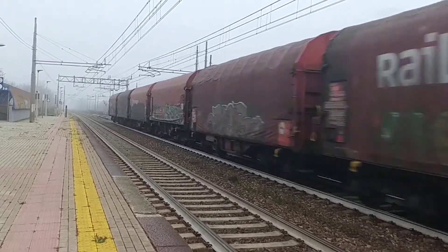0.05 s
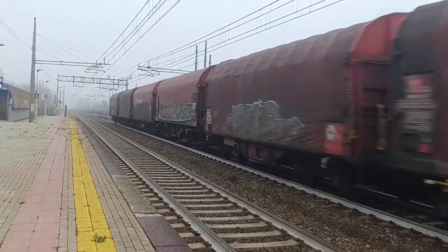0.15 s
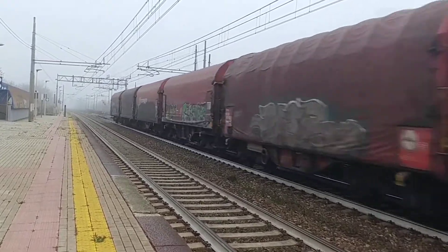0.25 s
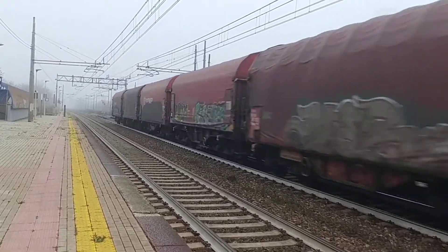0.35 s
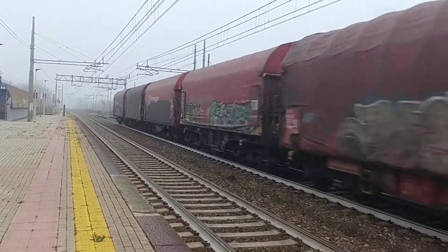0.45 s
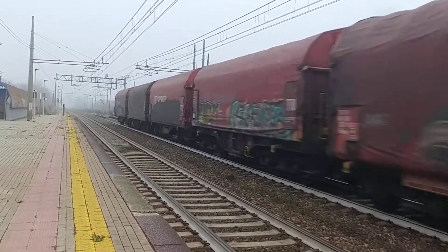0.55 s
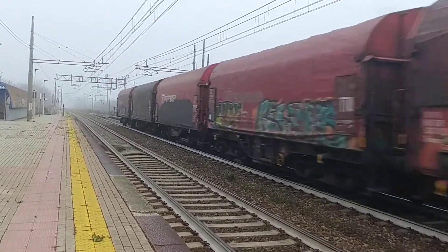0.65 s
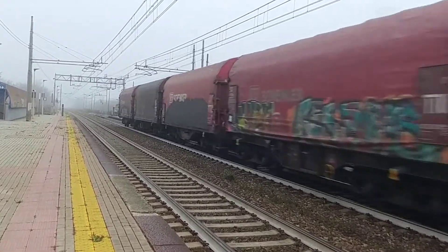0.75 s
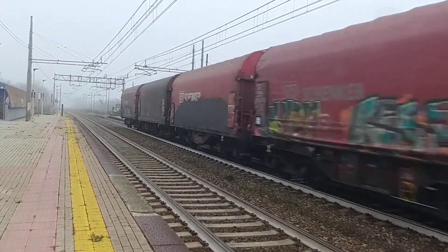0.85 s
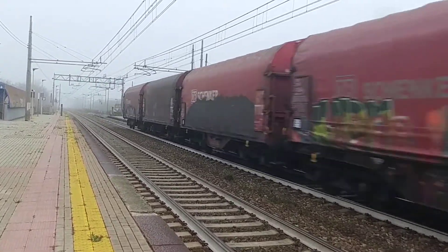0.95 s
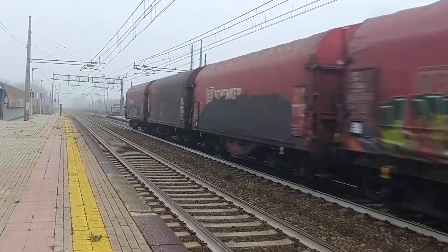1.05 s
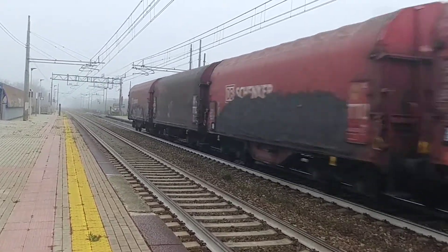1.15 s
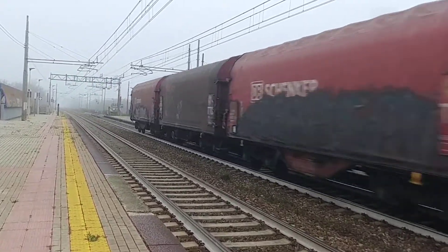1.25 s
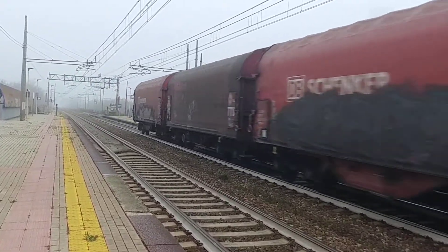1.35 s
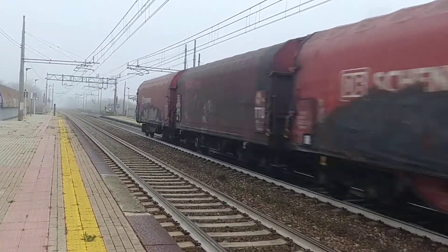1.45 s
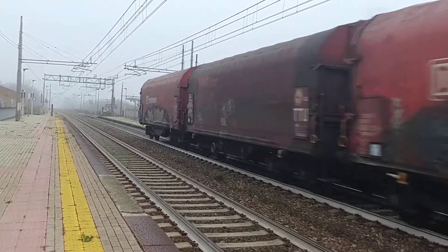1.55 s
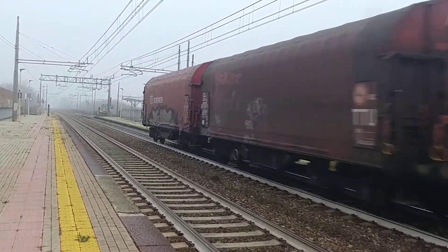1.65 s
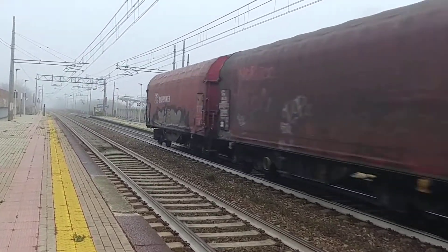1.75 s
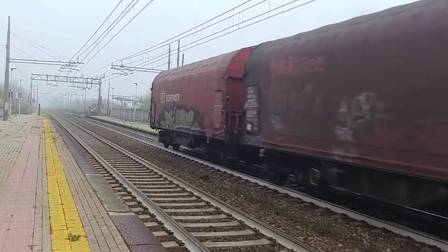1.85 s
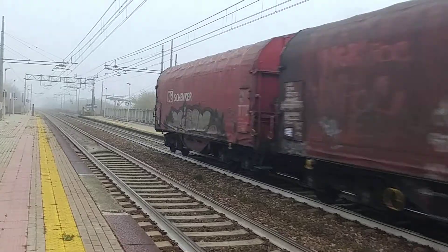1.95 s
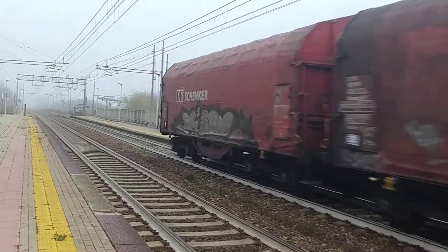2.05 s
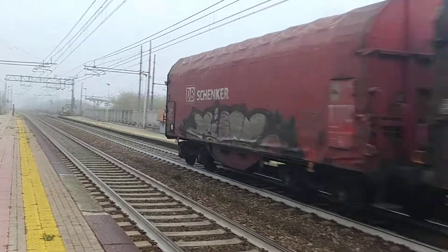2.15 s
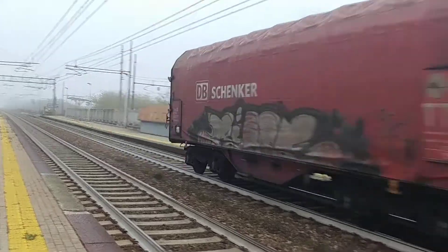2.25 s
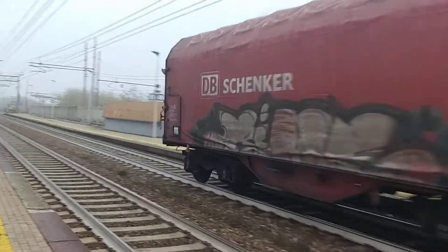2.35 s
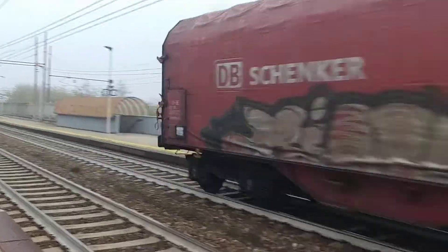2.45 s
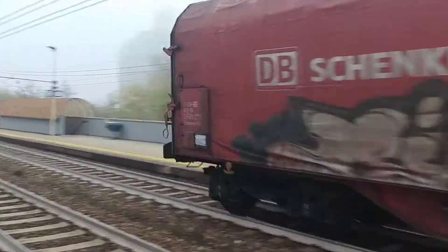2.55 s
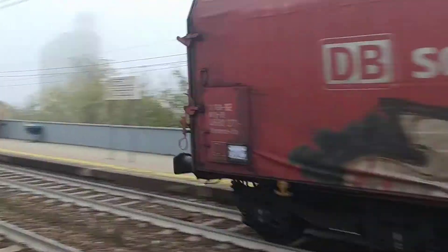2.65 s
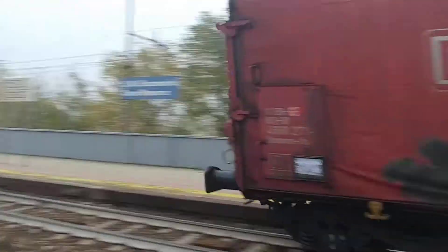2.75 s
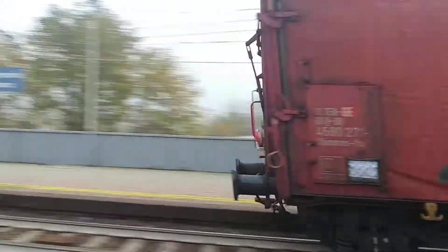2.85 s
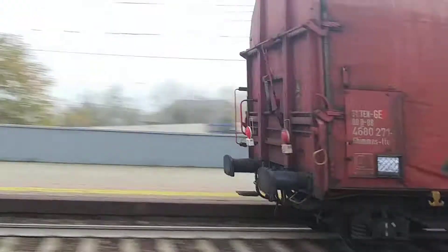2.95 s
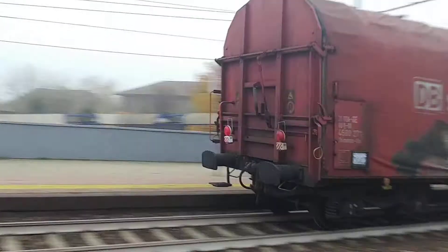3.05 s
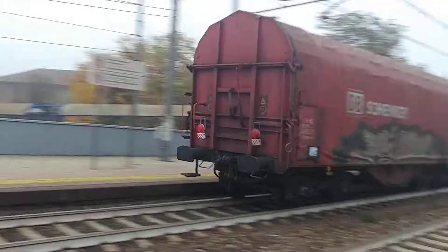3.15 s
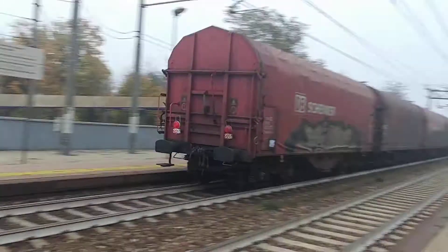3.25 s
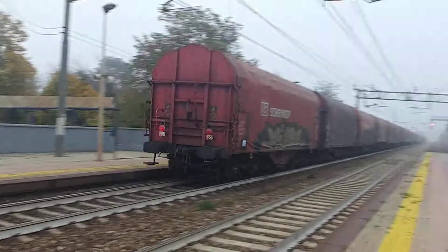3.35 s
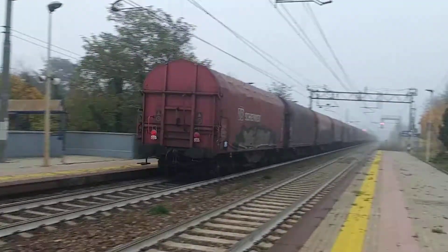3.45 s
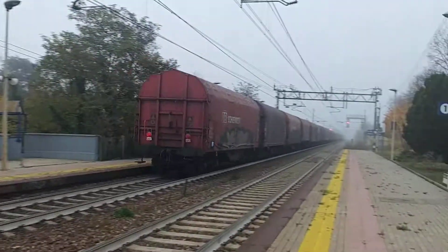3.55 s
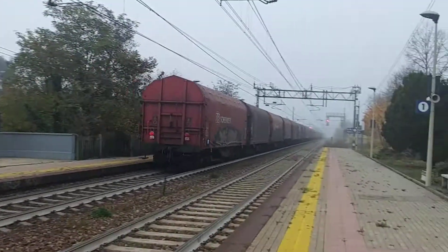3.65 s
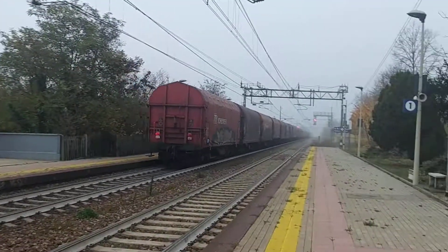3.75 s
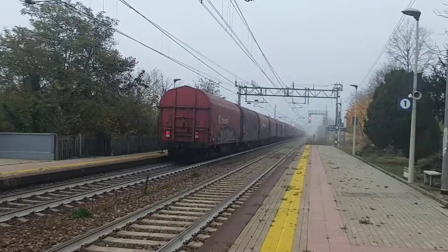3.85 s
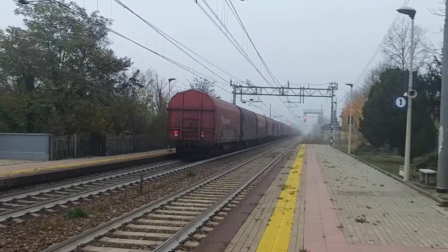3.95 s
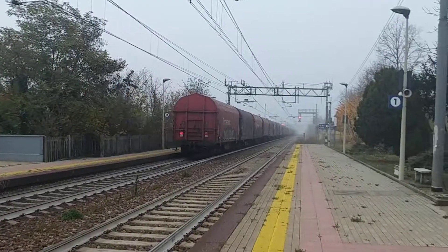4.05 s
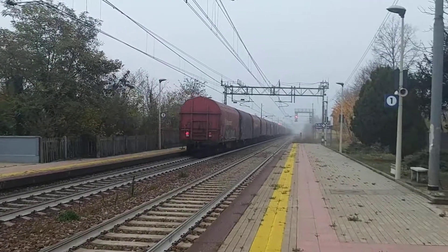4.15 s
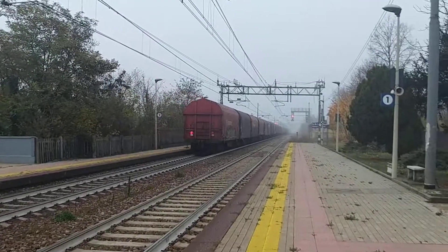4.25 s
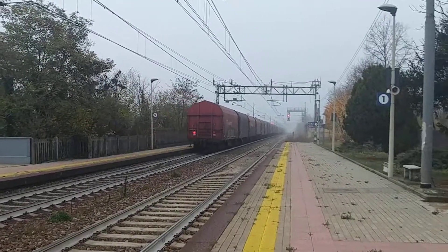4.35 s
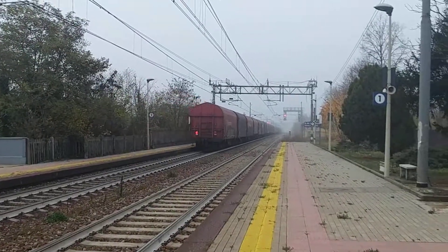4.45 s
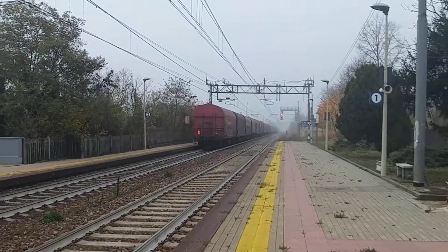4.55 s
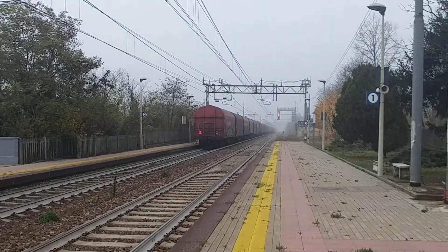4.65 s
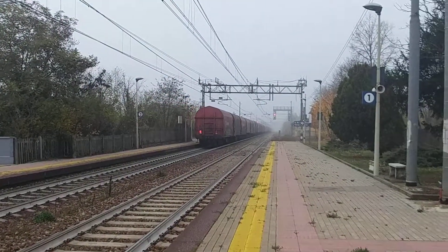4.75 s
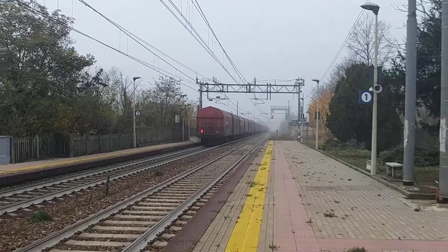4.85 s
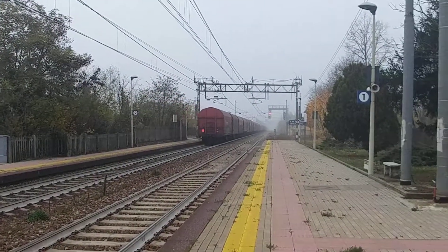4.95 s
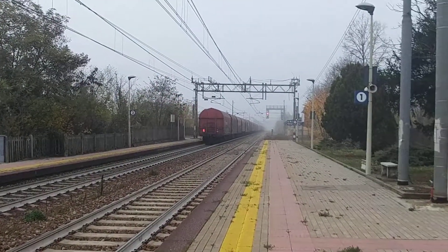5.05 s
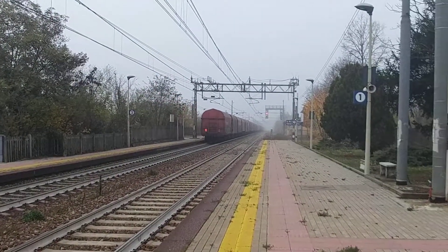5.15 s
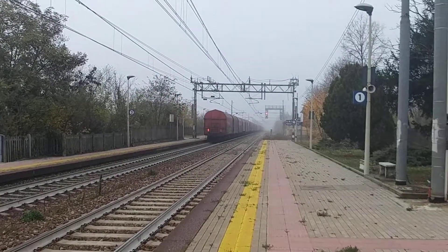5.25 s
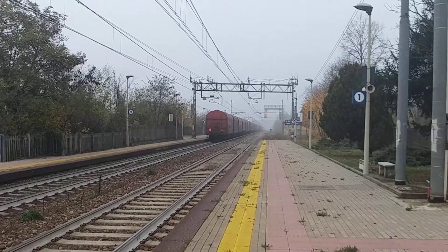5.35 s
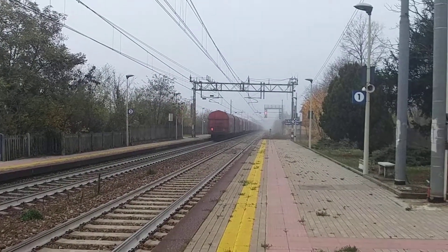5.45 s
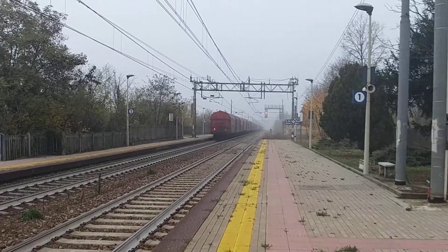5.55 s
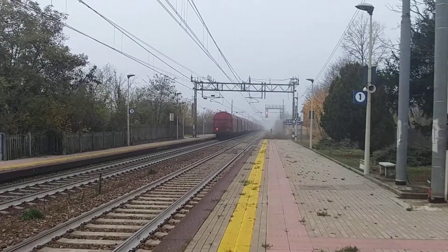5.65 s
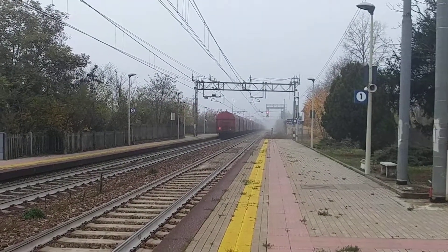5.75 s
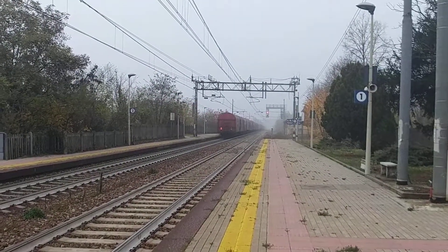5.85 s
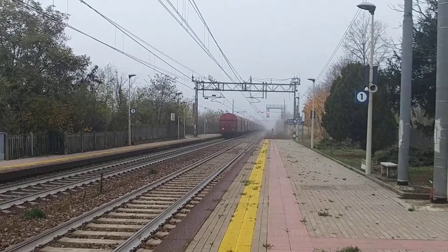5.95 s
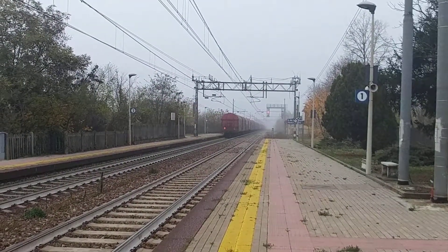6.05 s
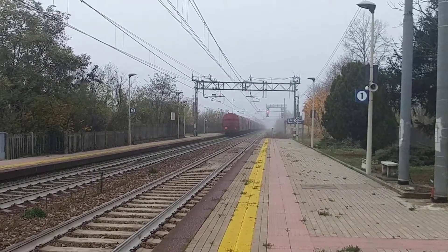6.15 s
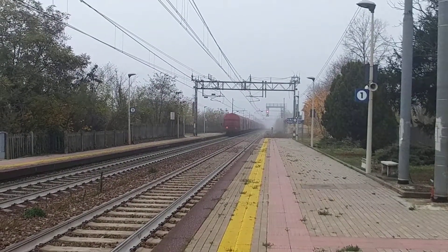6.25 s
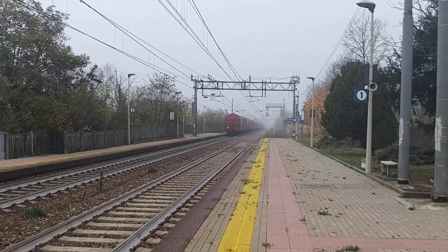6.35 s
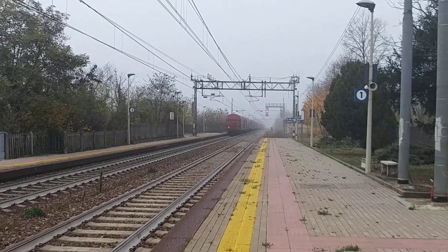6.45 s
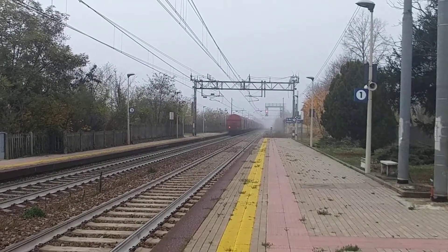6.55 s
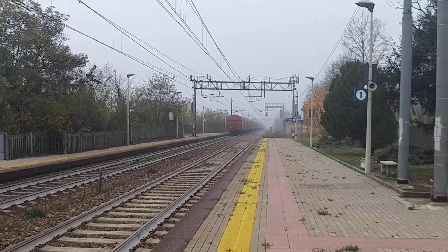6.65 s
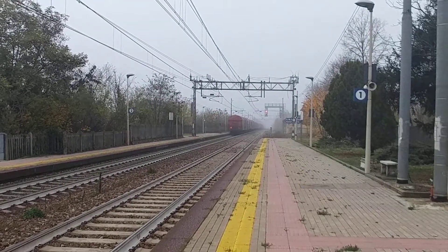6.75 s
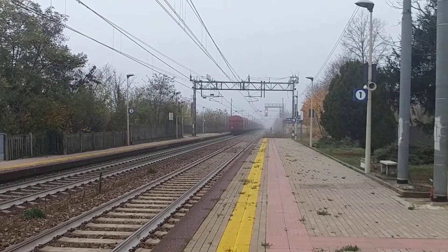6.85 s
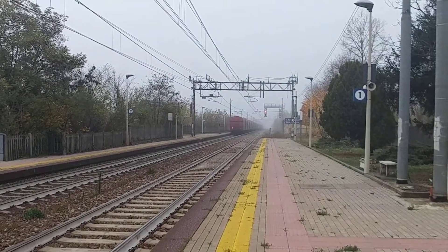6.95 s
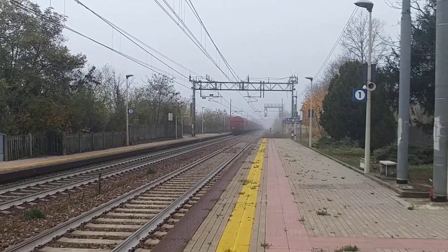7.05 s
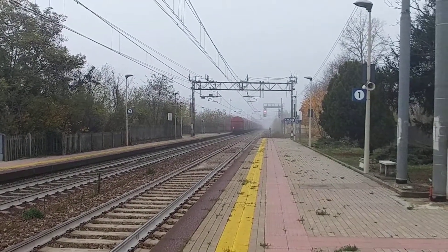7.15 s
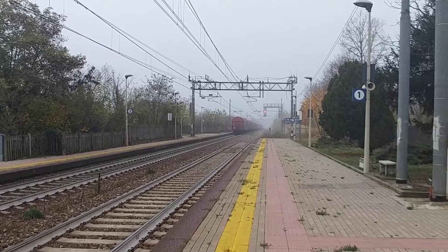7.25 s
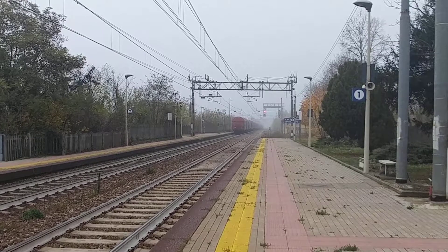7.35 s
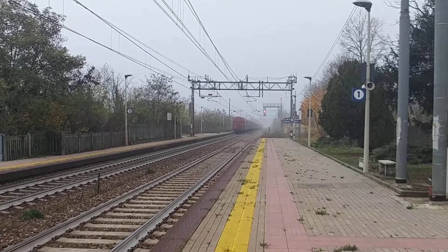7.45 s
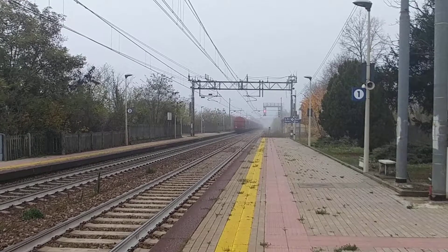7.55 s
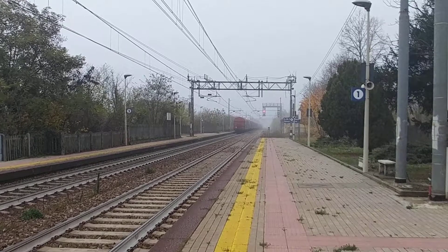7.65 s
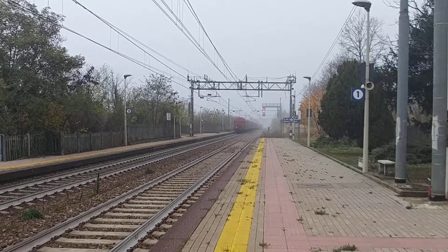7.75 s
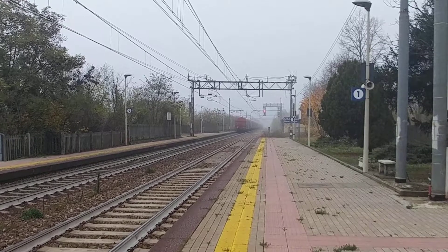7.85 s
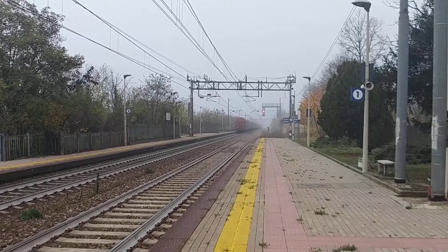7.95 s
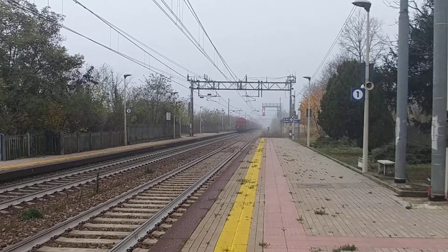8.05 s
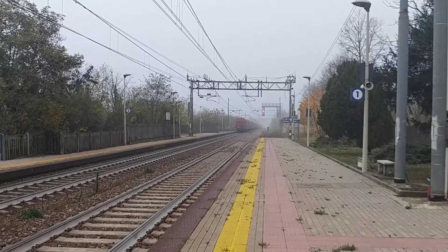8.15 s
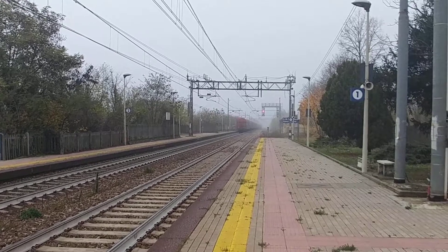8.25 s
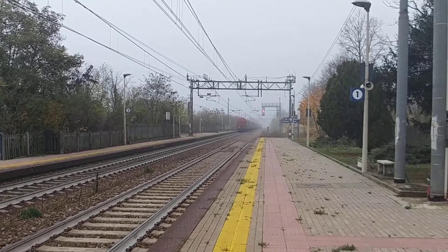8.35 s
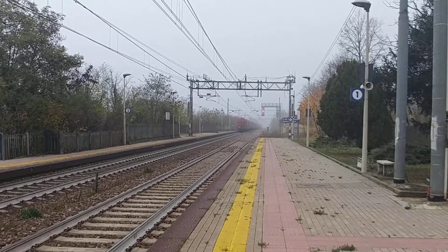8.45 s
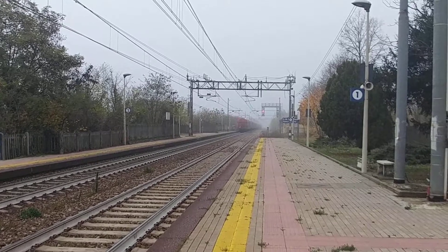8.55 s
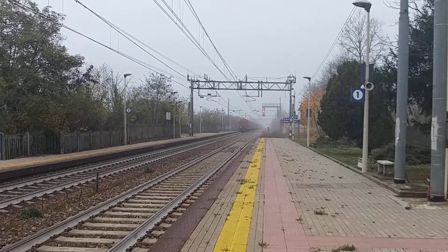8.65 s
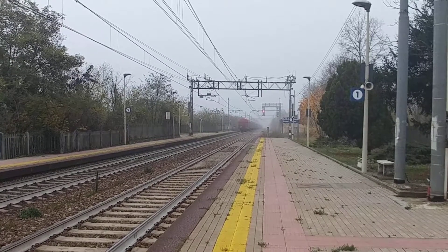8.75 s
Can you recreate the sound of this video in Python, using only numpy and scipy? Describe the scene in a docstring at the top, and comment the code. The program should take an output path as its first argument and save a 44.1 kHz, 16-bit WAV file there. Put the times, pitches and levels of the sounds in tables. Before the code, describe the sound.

Close stereo sound outdoors on a station platform: heavy wagons thunder past, their wheels ringing on the rails with pitches that sink as each passes. Short high squeals, clattering knocks and dull body thumps punctuate the first three seconds and a little after. Then the train runs away, the sound moves toward the centre, the treble drops off, and a softer, blurred, low rolling noise remains to the end.

```python
"""A roar and a deep boom from the right: a freight train at full speed through a small station, one track away.
Roar: noise shaped by rail and wheel resonances that sink in pitch as each bogie pair passes, plus rattle.
Boom: throbbing low noise. Over them: squeals (gliding tones), knocks and thumps (short noise bursts).
The last wagon passes at 3 s, the microphone pair swings after it, and the roar dulls as it runs off into the fog."""
import sys
import numpy as np
from scipy import signal
from scipy.fft import rfft, irfft
from scipy.io import wavfile
from scipy.ndimage import uniform_filter1d, minimum_filter1d

SR = 44100
rng = np.random.default_rng(int(sys.argv[2]) if len(sys.argv) > 2 else 0)


def generate_wav(sig):
    """Save sig (samples, or channels by samples) to the path in sys.argv[1] as 16-bit PCM at SR."""
    pcm = np.round(np.clip(np.atleast_2d(sig).T, -1, 1) * 32767).astype(np.int16)
    wavfile.write(sys.argv[1], SR, pcm)


N = 388521

SPEED_M_S, TRACK_M, SOUND_M_S = 23, 7, 343  # train speed, distance to track, speed of sound
FRAME, HOP = 1024, 256  # samples
HZ = np.fft.rfftfreq(FRAME, 1 / SR)
TIMES = np.arange(-(-N // HOP) + 1) * HOP / SR  # frame times, s


def gain_of(db):
    """Decibels to amplitude."""
    return 10 ** (np.asarray(db) / 20)


def evened(x):
    """Scales to rms 1."""
    return x / np.sqrt(np.mean(x ** 2) + 1e-20)


def over_hz(table, hz=HZ):
    """Table columns, interpolated over log frequency."""
    f, *columns = np.transpose(table)
    return np.array([np.interp(np.log(hz + 1), np.log(f + 1), c) for c in columns])


def over_time(table):
    """Table columns, interpolated at the frame times."""
    s, *columns = np.transpose(table)
    return np.array([np.interp(TIMES, s, c) for c in columns])


def above(edge_hz, order):
    """Soft step from 0 to 1 across a frequency."""
    return HZ ** order / (HZ ** order + edge_hz ** order)


def bell(hz, centre_hz, width_hz):
    """Gaussian resonance shape, 1 at its centre."""
    return np.exp(-.5 * np.minimum(((hz - centre_hz) / width_hz) ** 2, 60))


def swell(t, s, length_s, db):
    """Smooth rise and fall (dB) around time s."""
    return db * np.exp(-((t - s) / length_s) ** 2)


def white():
    """Short-time spectra (frames, bins) of white noise."""
    return signal.stft(rng.standard_normal(N), nperseg=FRAME, noverlap=FRAME - HOP)[2].T


def patches(rate_hz, width_hz):
    """Random field of rms 1, smoothed to the given rate over time and width over frequency."""
    shape = len(TIMES), len(HZ)
    fast = np.fft.fftfreq(shape[0], HOP / SR)[:, None] / rate_hz
    fine = np.fft.fftfreq(shape[1], HZ[1]) * width_hz
    spectrum = np.fft.fft2(rng.standard_normal(shape)) * np.exp(-fast ** 2 - fine ** 2)
    return evened(np.fft.ifft2(spectrum).real)


def doppler(abreast_s):
    """For sources abreast at the given times: distance (m), cosine of departure (-1 to 1)."""
    along_m = SPEED_M_S * (TIMES - abreast_s)
    distance_m = np.hypot(along_m, TRACK_M)
    return distance_m, along_m / distance_m


# Rail and wheel resonances: f/Hz at rest, half width/Hz, level/dB over the roar
RINGS = [(1330, 49, 6), (1965, 23, 7.5), (2159, 67, 8), (2736, 56, 4.5), (3400, 90, 1), (3700, 79, -10),
         (4400, 34, 3), (5160, 110, -0.5), (7760, 330, 0)]
# Bogie pairs: t/s abreast, level/dB relative weight in the ringing
BOGIES = [(-0.12, 7), (0.4, 3), (0.92, 2), (1.43, 2.5), (1.95, 1), (2.47, -4), (3.0, -1.5)]
# Narrow gliding bands in the roar: t/s abreast, f/Hz at rest, half width/Hz, level/dB over the roar abreast
GLIDING_BANDS = [(0.38, 1350, 48, 9.5), (0.67, 3500, 50, 3), (0.98, 4000, 45, 1.5), (1.25, 3820, 39, 1),
                 (1.4, 3630, 60, 0), (1.35, 1310, 32, 11), (2.53, 1370, 25, 11.5), (2.4, 5200, 140, 0.5),
                 (2.5, 1340, 20, 9), (2.7, 740, 25, -3), (2.8, 1020, 40, 3), (3.2, 3700, 30, 3),
                 (3.4, 1250, 45, 7), (4.6, 3600, 56, 1), (3.1, 5300, 80, -1)]


def ringing(forward_db=1.0, wander=0.0016):
    """Resonance gain: each bogie pair and gliding band has its own, slightly wandering Doppler pitch."""
    abreast_s, db = np.transpose(BOGIES)[..., None]
    distance_m, leaving = doppler(abreast_s)
    share = (gain_of(db - forward_db * leaving) / distance_m) ** 2  # nearest bogies dominate
    share = share / share.sum(0)
    peaks = sum(gain_of(peak_db) ** 2 * bell(HZ, hz, width) for hz, width, peak_db in RINGS)
    wandering_hz = HZ * (1 + wander * patches(rate_hz=4.6, width_hz=960))
    at_rest_hz = wandering_hz * (1 + SPEED_M_S / SOUND_M_S * leaving)[..., None]
    power = 1 + (np.interp(at_rest_hz, HZ, peaks) * share[..., None]).sum(0)
    for s, hz, width, over_db in GLIDING_BANDS:
        distance_m, leaving = doppler(s)
        pitch_hz = hz / (1 + SPEED_M_S / SOUND_M_S * leaving[:, None])
        nearness = TRACK_M / distance_m[:, None]
        power += (gain_of(over_db) * nearness) ** 2 * bell(wandering_hz, pitch_hz, width)
    return np.sqrt(power)


def rattle(per_s=26, size_db=2.7, die_s=0.0077):
    """Couplings and brake gear knock at random: short treble lifts (dB), each in its own band."""
    chance, size, pitch = rng.random((len(TIMES), 3)).T
    lifts_db = (chance < per_s * HOP / SR) * np.minimum(-np.log(size), 3) * size_db
    centre_hz = 1500 * 8 ** pitch[:, None]
    band = np.exp(-np.log2((HZ + 1) / centre_hz) ** 2)
    return signal.lfilter([1], [1, -np.exp(-HOP / SR / die_s)], lifts_db[:, None] * band, axis=0)


def fade(t, level_db, drop_at_m, drop_m, drop_db, ebb_db_per_m):
    """Level (dB) by how far the last bogie has gone: hold, drop, then linear drift."""
    beyond_m = SPEED_M_S * (t - BOGIES[-1][0]) - drop_at_m
    drop = drop_db * (1 + np.tanh(beyond_m / drop_m)) / 2
    return level_db - drop - ebb_db_per_m * np.maximum(beyond_m, 0)


# Rumble, roar, hiss: level/dB alongside, mid-drop/m, drop half length/m, drop/dB, ebb/(dB/m), negative = rises
FADES = {"rumble": (-1.5, 20.5, 4, 7, 0.17), "roar": (-0.5, 12.5, 14, 10, 0.0235),
         "hiss": (-1, 20.5, 3.5, 7.5, -0.0259)}
# Swells and dips of one register: t/s, half length/s, level/dB, f/Hz, half width/octaves
SURGES = [(0.29, 1.0, 1.5, 2200, 0.92), (0.5, 0.16, 7, 110, 0.61), (4.1, 0.28, 3.5, 900, 0.28),
          (1.9, 0.34, 3.5, 207, 0.66), (3.4, 0.5, 4, 750, 0.21), (3.76, 0.24, 1, 1600, .4),
          (4, 0.14, -1, 770, 0.63), (1.07, 0.092, 1, 6100, 0.26), (3.05, .1, 2.5, 7600, 0.46),
          (4.14, 0.65, 3, 5000, 1.6), (8.6, 0.65, -2.5, 4400, 1.4), (8.1, 0.88, 8.5, 144, 0.44),
          (7.33, 0.5, 2.5, 1140, 0.27)]


def passing(rumble_hz=370, hiss_hz=2060):
    """Level (dB) over time and frequency: wagon rumble below, rail roar in the middle, wheel hiss on top."""
    t, low, high = TIMES[:, None], 1 - above(rumble_hz, order=7), above(hiss_hz, order=2)
    db = low * fade(t, *FADES["rumble"])
    db = db + (1 - low - high) * fade(t, *FADES["roar"])
    db = db + high * fade(t, *FADES["hiss"])
    for s, length_s, lift_db, hz, octaves in SURGES:
        register = np.exp(-(np.log2((HZ + 1) / hz) / octaves) ** 2)
        db += swell(t, s, length_s, lift_db) * register
    return db


def holder_echo(behind, delay_ms=1.693, strength=0.27, hollow_hz=6300, hollow_width_hz=330, hollow_db=-4):
    """Far sound is directional: its echo off the microphones' holder combs the treble; one band goes hollow."""
    echo = strength * behind * above(1700, order=4) * np.exp(-2j * np.pi * HZ * delay_ms / 10 ** 3)
    hollow = np.exp(-((HZ - hollow_hz) / hollow_width_hz) ** 2)
    return abs(1 + echo) * gain_of(hollow_db * behind * hollow)


# Microphone ports: f/Hz, response level/dB, left minus right level/dB (applied in the treble)
PORTS = [(1440, -0.5, 0.5), (1920, 0.5, -4), (2510, -4, -4), (3160, 2.5, 3.5), (4200, 3, -3.5),
         (5820, 1.5, -2), (6100, 1.5, -3), (7480, 0, -9), (8120, -1, -2), (9070, -10, 6), (9900, 2.5, 7),
         (11550, -2.2, 0.5), (14500.0, -2.5, -0.1)]
# Likeness of the ports beside the train, then behind it: f/Hz, likeness/(0-1)
LIKE_BESIDE = [(100, 0.87), (240, 0.97), (400, 0.7), (600, 0.83), (950, 0.52), (1230, 0.7), (1420, 0.47),
               (1620, 0.33), (1850, 0), (2200, 0.55), (2500, 0.3), (2800, 0.45), (3600, 0), (8000, 0)]
LIKE_BEHIND = [(250, 1), (380, 0.94), (650, 0.99), (840, 0.62), (980, .05), (1100, 0.088), (1220, 0.64),
               (1330, 0.47), (1850, 0.76), (2200, 0.5), (2420, 1), (2800, 0.1), (3050, 1), (3300, 0.15),
               (3550, 0.48), (3850, .1), (4100, 0.53), (4400, .1), (4720, 0.31), (8000, 0.045)]
# Train to the right until the pair swings round: t/s, left-port treble lag/ms
BEARING = [(0, 0.37), (2.6, 0.42), (2.9, 0.2), (3.1, 0.071)]


def at_ports(field, behind, bass_lag=0.54):
    """Noise of the given magnitude at two ports: partly alike, the left one later."""
    like = np.clip((1 - behind) * over_hz(LIKE_BESIDE) + behind * over_hz(LIKE_BEHIND), 0, 1)
    lag_share = bass_lag + (1 - bass_lag) * above(840, order=6)  # low notes come from all round
    lag_ms = over_time(BEARING).T * lag_share
    right = white()
    left = like * right + np.sqrt(1 - like ** 2) * white()
    left = left * np.exp(-2j * np.pi * HZ * lag_ms / 10 ** 3)
    response_db, balance_db = over_hz(PORTS)
    balance_db = balance_db * above(1200, order=6)  # long waves bend round the casing
    pair = np.array([left * gain_of(balance_db / 2), right * gain_of(-balance_db / 2)])
    z = pair * field * gain_of(response_db)
    return signal.istft(z.transpose(0, 2, 1), nperseg=FRAME, noverlap=FRAME - HOP)[1][:, :N]


# Rolling noise before fades: f/Hz, level/dB oncoming, level/dB abreast, level/dB going away, level/dB far off
ROLLING = [(129, -6, -1, -2, 4.5), (235, 6.5, 5, 8.5, 8), (279, 1.5, 2.5, -4.5, 1), (333, 6, 0, -2, -3.5),
           (411, -2, -5, -2.5, -2.5), (558, 5.5, 9.5, 5.5, 7.5), (660, 8.5, 8, 5.5, 4),
           (944, 5.5, 2.5, -2, -11.5), (1023, 2, -6.5, -1.5, -6.5), (1110, -3.5, -1, 1, -7),
           (1617, -5.5, -9.5, -9.5, -16.5), (2370, -9.5, -9, -14.5, -23.5), (4450, -16.5, -17, -20.5, -30),
           (7460, -17, -17.5, -23.5, -41.5), (14940, -38.5, -39, -45, -59)]
# When each of those four sides faces the microphones: t/s
SIDE_TIMES = [2.3, 3.3, 4.5, 8.4]
# Resonances and hollows of the sound from far down the line: f/Hz, half width/Hz, level/dB
FAR_RINGS = [(221.5, 18, 1), (298, 13, 6), (373, 32, -5.5), (910, 55, 3), (1795, 25, 3), (2220, 65, -0.5),
             (2510, 55, 5), (2690, 50, 1), (3100, 150, -0.5), (3600, 130, 0.9), (3940, 64, -1),
             (4380, 70, -2), (4780, 380, 1), (4900, 60, -1.5), (5900, 45, 1), (6160, 110, -1)]


def rolling(flutter_db=0.63, scrape_db=0.5, air_db=0.5, lumps_db=0.5, far_blur=.85):
    """Rough wheels on rough rails: a roar with moving resonances, coloured by the side facing the microphones."""
    sides = np.array([np.interp(TIMES, SIDE_TIMES, one) for one in np.eye(len(SIDE_TIMES))]).T
    behind = sides[:, 2:].sum(1, keepdims=True)
    db = sides @ over_hz(ROLLING) + passing()
    db += flutter_db * patches(rate_hz=23, width_hz=1500)  # uneven treads come round
    db += scrape_db * patches(rate_hz=47, width_hz=11000) * above(1800, order=2)  # flanges brush the rail
    # close by the roar is lumpy
    db += lumps_db * patches(rate_hz=31, width_hz=440) * (1 - above(2000, order=4)) * (1 - behind)
    db += behind * sum(ring_db * bell(HZ, hz, width) for hz, width, ring_db in FAR_RINGS)
    db += air_db * patches(rate_hz=4.6, width_hz=93) * behind  # moving air makes the far sound waver
    db += rattle() * (1 - far_blur * behind)  # distance blurs the knocks
    low_edge_hz = sides @ np.array([[84], [84], [100], [120]])  # deepest rumble only close by
    field = gain_of(db) * ringing() * holder_echo(behind) * above(low_edge_hz, order=8)
    return at_ports(field, behind)


# Short swells and dips of the boom: t/s, half length/s, level/dB
BOOM_SWELLS = [(0, 0.14, -5), (.24, 0.043, 6), (0.498, .04, -6), (.64, 0.091, 4.5), (1.03, .05, 5),
               (1.117, 0.035, -3), (1.35, 0.16, 3.5), (1.528, 0.042, -3), (2.11, 0.04, 6),
               (2.298, 0.052, 4), (2.764, .06, 5.5), (3.24, 0.041, 7), (3.613, .13, 1), (3.867, 0.083, -4),
               (4.08, 0.052, 5), (4.903, 0.052, 6), (5.3, 0.18, -1), (6.24, 0.045, 7), (7.85, 0.54, 2.5)]
# Boom fade: level/dB alongside, mid-drop/m, drop half length/m, drop/dB, ebb/(dB/m)
BOOM_FADE = (-24, 21, 14, 6.3, .056)


def throb(t, rate_hz=4, spread_hz=2.0, depth_db=0.1):
    """Level (dB) of the boom: it throbs unevenly."""
    off = (np.fft.rfftfreq(N, 1 / SR) - rate_hz) / spread_hz
    throb_db = depth_db * evened(irfft(rfft(rng.standard_normal(N)) * np.exp(-off ** 2), N))
    swells_db = sum(swell(TIMES, *row) for row in BOOM_SWELLS)
    return fade(t, *BOOM_FADE) + throb_db + np.interp(t, TIMES, swells_db)


# Boom spectrum: f/Hz, relative level/dB
BOOM_SHAPE = [(10, -45), (22, -22), (33, -37), (48, 0), (62, 1.5), (70, 7), (78, 3), (92, -0.5), (115, -4),
              (150, -37), (250, -100)]


def boom(apart=0.1, overtone_hz=88, overtone_far_db=-8):
    """Axles bounce over the sleepers: a deep throbbing resonance, wide and full only while wagons are close."""
    t, hz = np.arange(N) / SR, np.fft.rfftfreq(N, 1 / SR)
    shape = gain_of(over_hz(BOOM_SHAPE, hz))
    mid, side = evened(irfft(rfft(rng.standard_normal((2, N))) * shape, N))
    mid = mid / np.sqrt(uniform_filter1d(mid ** 2, size=5500))  # flatten the noise's own swells
    overtones = irfft(rfft(mid) * (hz > overtone_hz), N)
    overtone_db = np.interp(t, [4.5, 6.5], [0, overtone_far_db])
    mid = mid - overtones + overtones * gain_of(overtone_db)
    side = side * apart * np.interp(t, [3, 4.2], [1, .25])
    return gain_of(throb(t)) * np.array([mid + side, mid - side])


# Short flange squeals: t/s, f/Hz, waver/Hz, level/dB
SQUEALS = [(.15, 3360, 22, -19), (.25, 3400, 26, -29), (.41, 3600, 20, -22), (.665, 3320, 29, -21),
           (.68, 3990, 25, -25), (.96, 3960, 55, -22), (1.05, 3950, 22, -25), (1.1, 3130, 49, -25),
           (1.25, 3760, 20, -26), (1.36, 3130, 53, -20), (3.021, 3150, 22, -25), (3.08, 3430, 27, -27),
           (3.2, 3290, 30, -25)]


def squeals(length_s=0.026, sag_hz_per_s=700):
    """A flange sticks and slips for an instant: one wheel mode swells and dies, its rough pitch sliding down."""
    t, out = np.arange(N) / SR, np.zeros((2, N))
    waver = evened(uniform_filter1d(rng.standard_normal((2, N)), size=150))
    for s, hz, waver_hz, db in SQUEALS:
        near = abs(t - s) < .15
        age = t[near] - s
        pitch_hz = hz - sag_hz_per_s * age + waver_hz * waver[:, near]
        turns = np.cumsum(pitch_hz, axis=1) / SR
        envelope = np.exp(-(age / length_s) ** 2)
        out[:, near] += np.sqrt(2) * gain_of(db) * envelope * np.sin(2 * np.pi * turns)
    return out


# Rough tread spots strike the rail: t/s, level/dB
KNOCKS = [(.482, -25), (.866, -17), (1.035, -12), (1.845, -22), (1.972, -15), (2.08, -8), (2.131, -12),
          (2.177, -16), (2.283, -17), (2.402, -13), (2.436, -15), (2.588, -24), (2.905, -11), (3.177, -19),
          (3.433, -11), (3.527, -10), (3.611, -16)]
# Struck rail modes: f/Hz at rest, half width/Hz, relative level/dB
KNOCK_MODES = [(1300, 70, 15), (1620, 250, -11), (2140, 240, 0)]


def knocks(rise_s=0.0017, die_s=0.01):
    """Each rough spot rings the rail for an instant, lower in pitch once the last wagon is leaving."""
    age = np.arange(SR // 8) / SR
    hz = np.fft.rfftfreq(len(age), 1 / SR)
    envelope = np.minimum(age / rise_s, 1) * np.exp(-np.maximum(age - rise_s, 0) / die_s)
    leaving, out = doppler(BOGIES[-1][0])[1], np.zeros((2, N))
    for s, db in KNOCKS:
        at_rest_hz = hz * (1 + SPEED_M_S / SOUND_M_S * np.interp(s, TIMES, leaving))
        modes = sum(gain_of(mode_db) * bell(at_rest_hz, centre, width)
                    for centre, width, mode_db in KNOCK_MODES)
        ring = evened(irfft(rfft(rng.standard_normal((2, len(age)))) * modes, len(age)))
        out[:, round(s * SR):][:, :len(age)] += gain_of(db) * envelope * ring
    return out


# Dull wagon thumps: t/s, f/Hz, level/dB
THUMPS = [(.56, 126, -22), (1.48, 150, -20), (1.762, 240, -14), (2.69, 215, -19), (3.19, 200, -20),
          (3.334, 190, -16), (3.398, 140, -20), (3.682, 135, -16.5), (3.769, 185, -15), (4.49, 180, -26),
          (4.599, 160, -28), (5.298, 160, -32)]


def thumps(length_s=0.021, width_hz=32):
    """A wagon body jolts: a short, dull noise burst around one low pitch."""
    t = np.arange(-SR // 10, SR // 10) / SR
    hz, out = np.fft.rfftfreq(len(t), 1 / SR), np.zeros(N)
    envelope = np.exp(-(t / length_s) ** 2)
    for s, centre_hz, db in THUMPS:
        noise = rfft(rng.standard_normal(len(t))) * bell(hz, centre_hz, width_hz)
        burst = evened(envelope * irfft(noise, len(t))) * np.sqrt(np.mean(envelope ** 2))
        out[round((s + t[0]) * SR):][:len(t)] += gain_of(db) * burst
    return out


def scene():
    """The whole train."""
    return rolling() + boom() + squeals() + knocks() + thumps()


def record(dry, ceiling=0.9, edge_hz=15300):
    """Fast limiter on the loudest peaks of each port, then the band limit."""
    needed = np.minimum(1, ceiling / (abs(dry) + 1e-9))
    gain = uniform_filter1d(minimum_filter1d(needed, size=61, axis=1), size=61, axis=1)
    lowpass = signal.firwin(511, edge_hz, window=("kaiser", 9), fs=SR)
    return signal.oaconvolve(dry * gain, lowpass[None], "same")


dry = scene()
out = record(dry)
generate_wav(out)
```